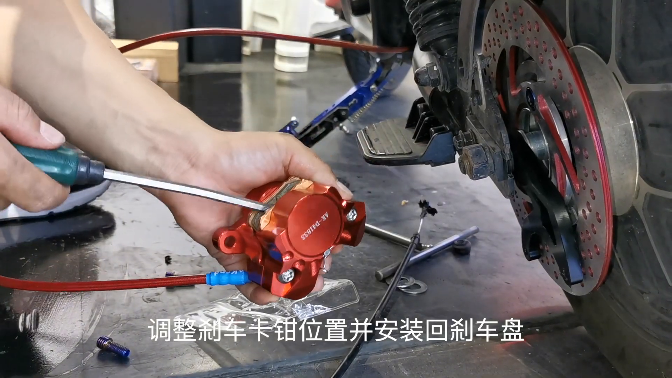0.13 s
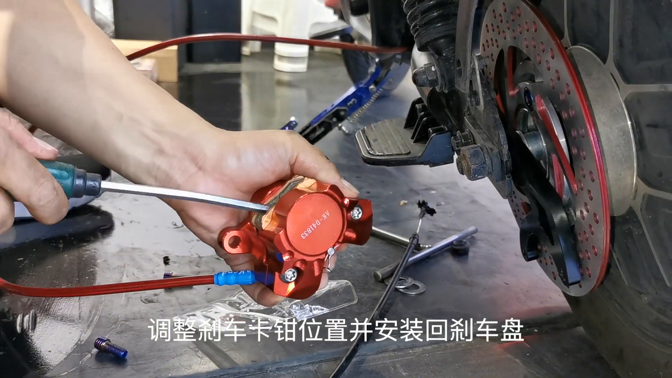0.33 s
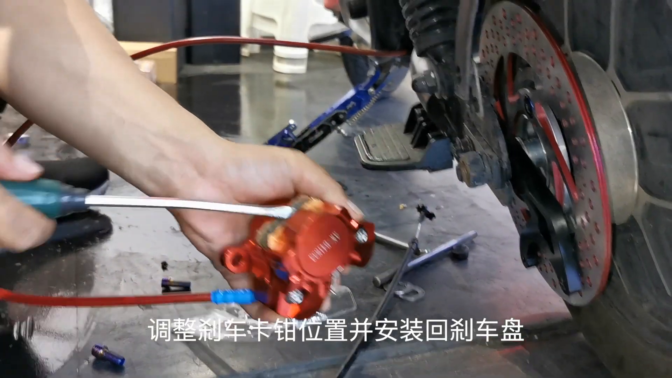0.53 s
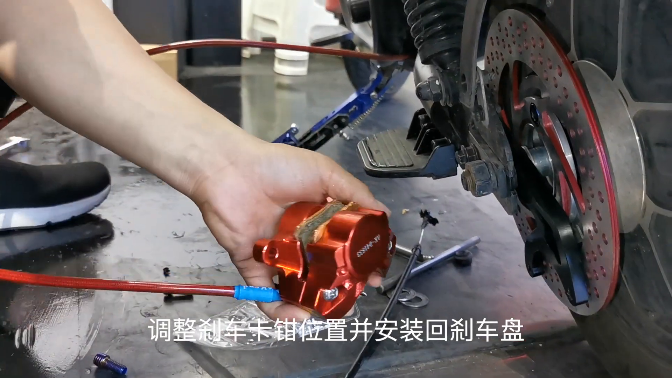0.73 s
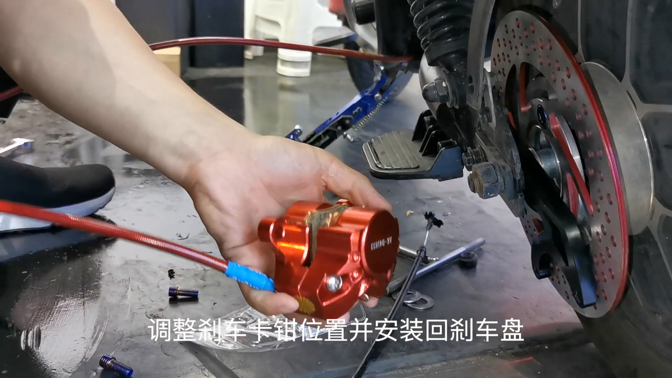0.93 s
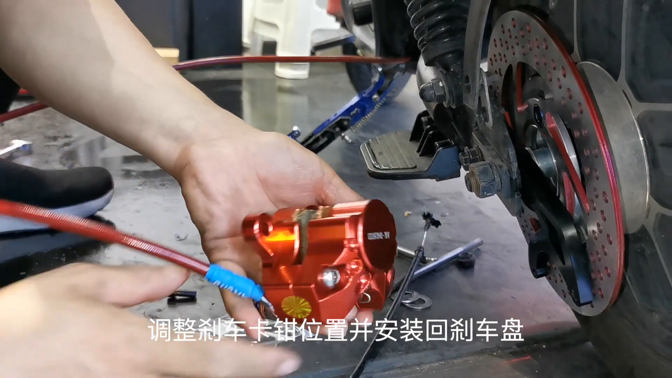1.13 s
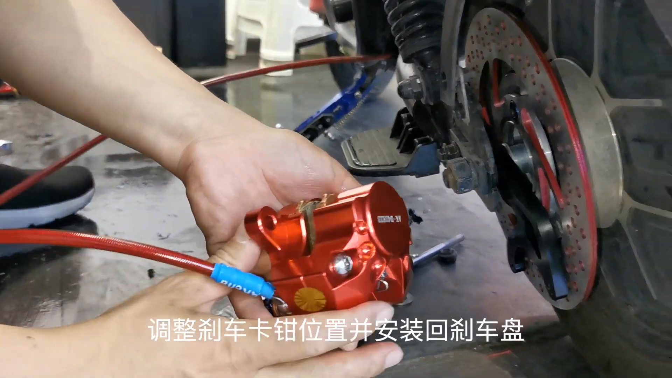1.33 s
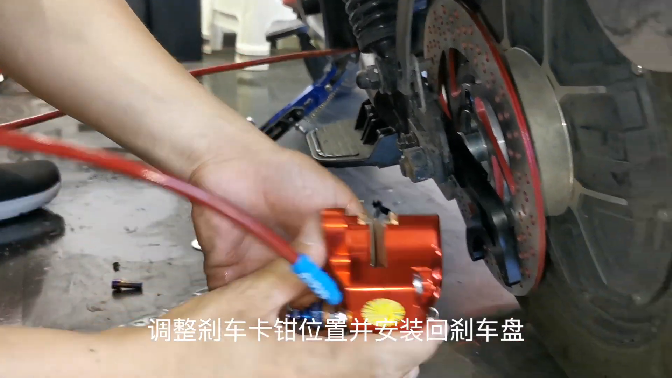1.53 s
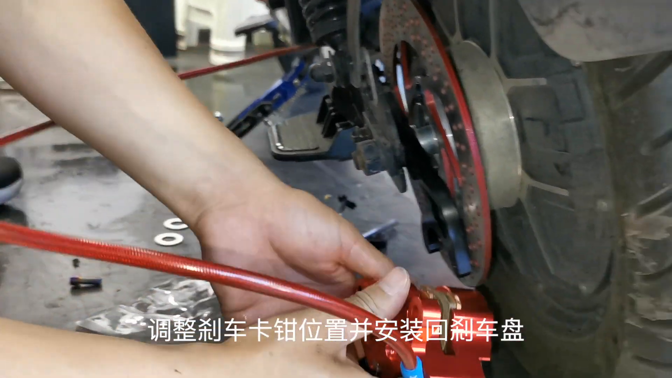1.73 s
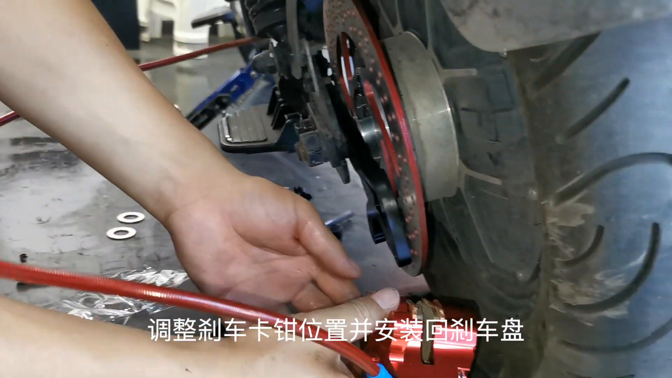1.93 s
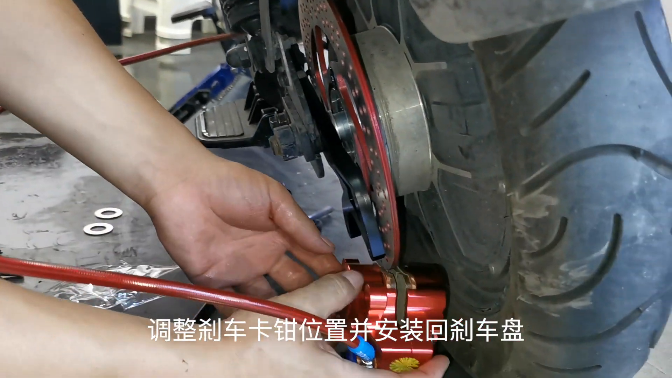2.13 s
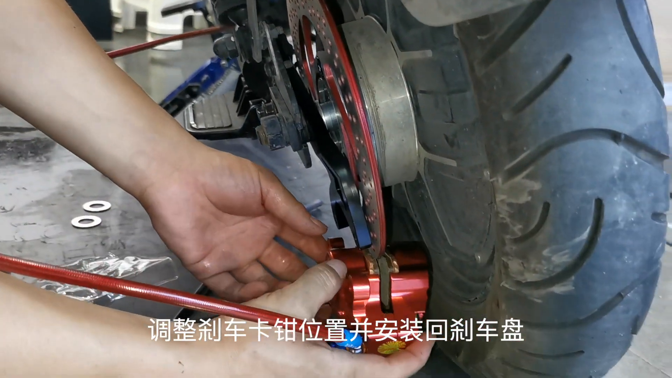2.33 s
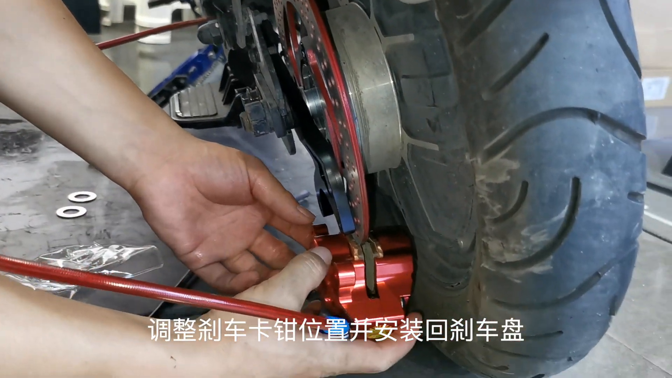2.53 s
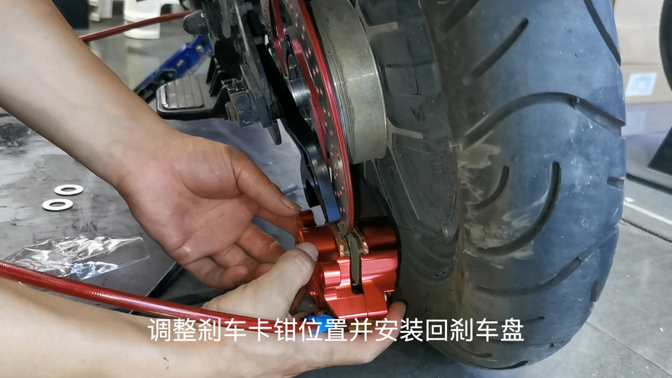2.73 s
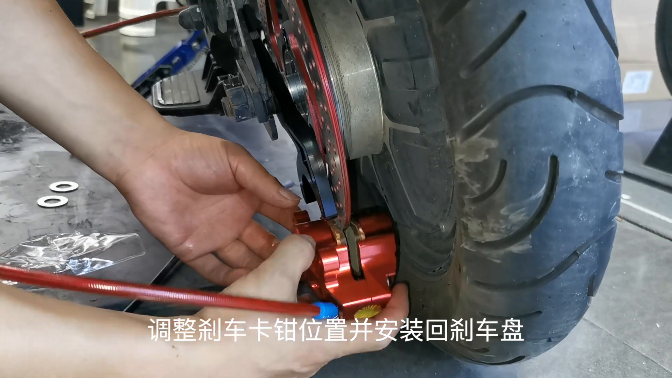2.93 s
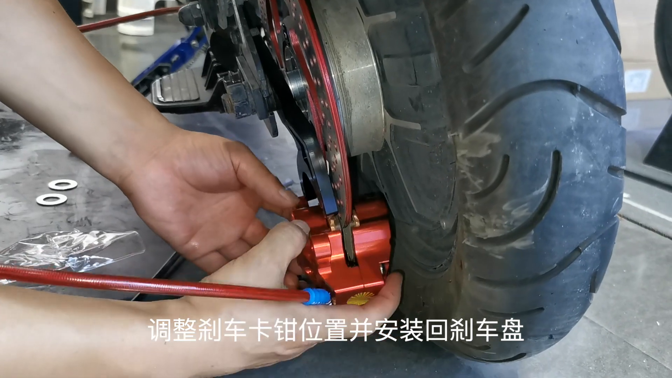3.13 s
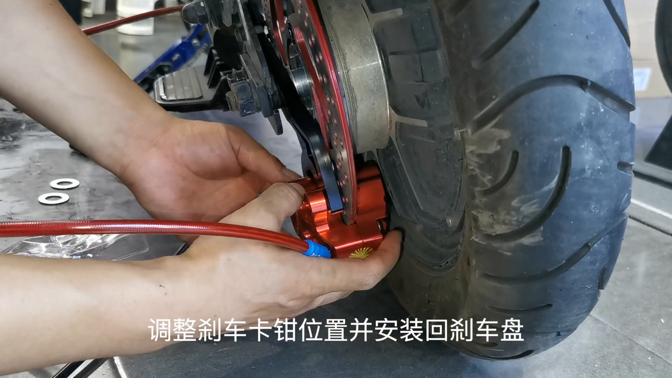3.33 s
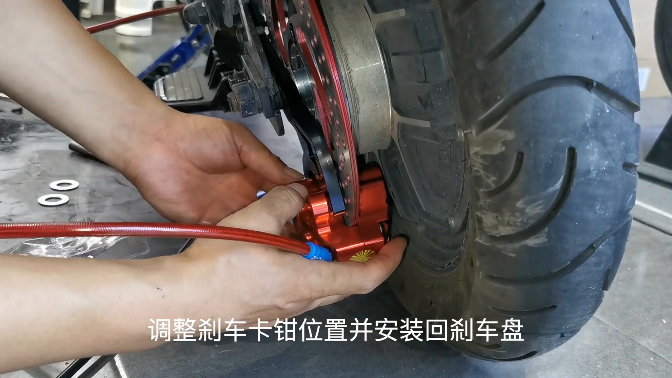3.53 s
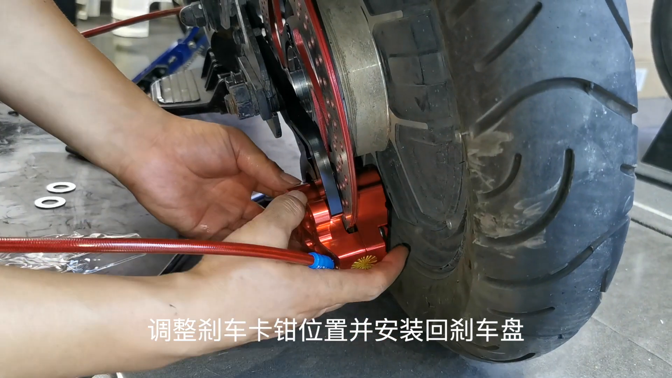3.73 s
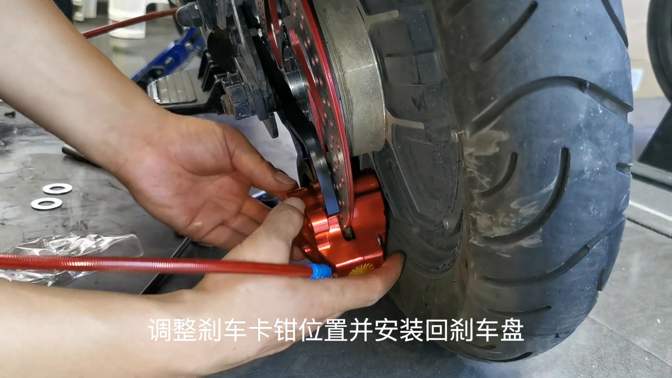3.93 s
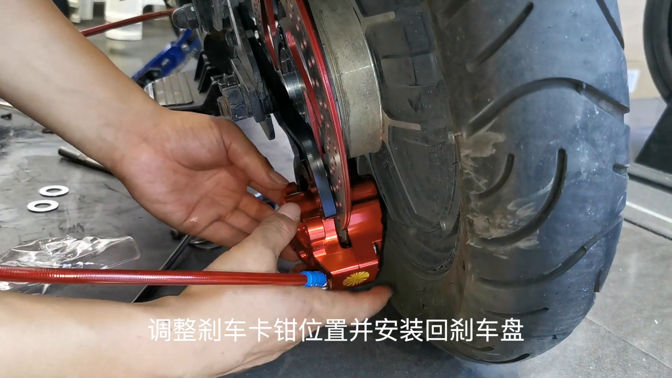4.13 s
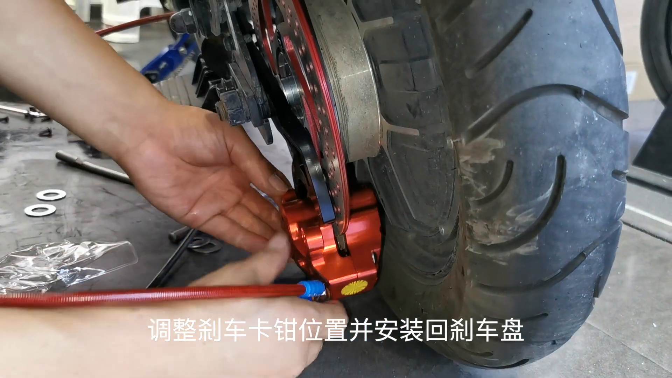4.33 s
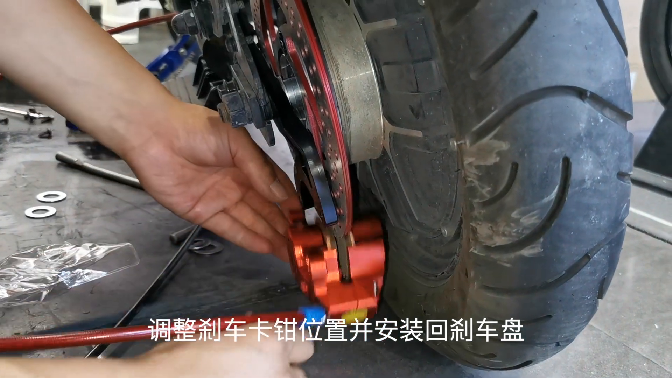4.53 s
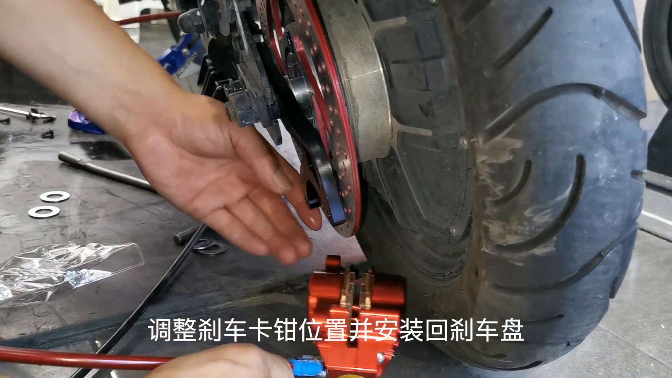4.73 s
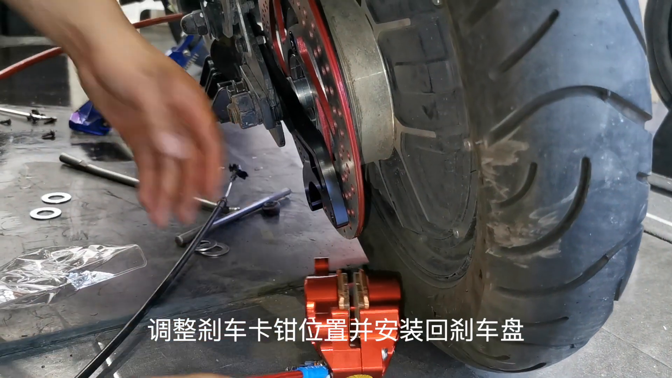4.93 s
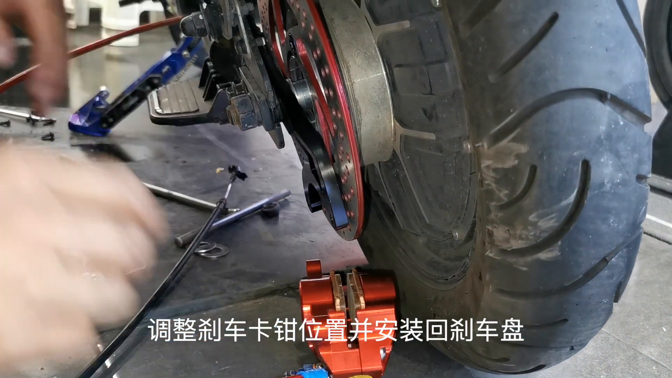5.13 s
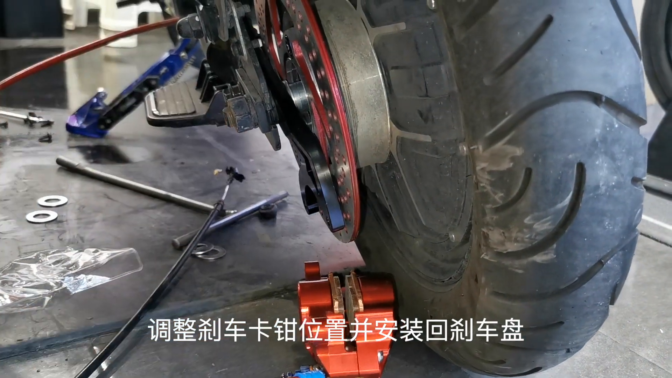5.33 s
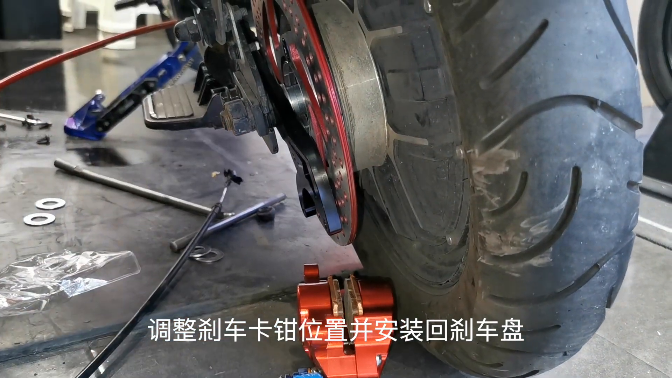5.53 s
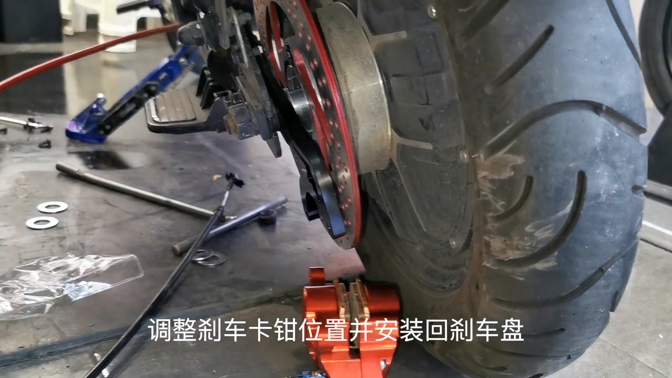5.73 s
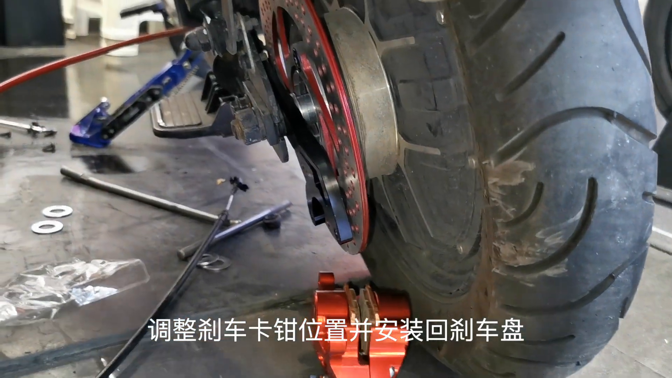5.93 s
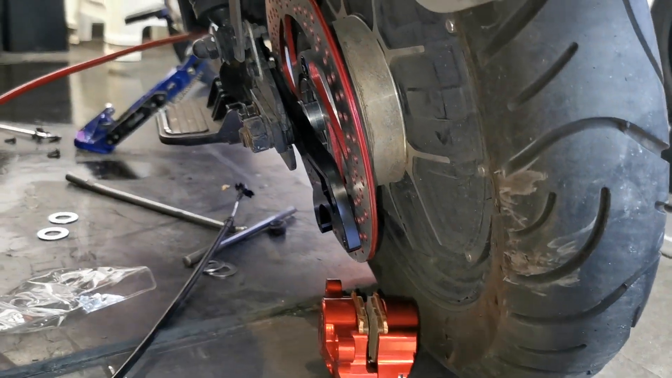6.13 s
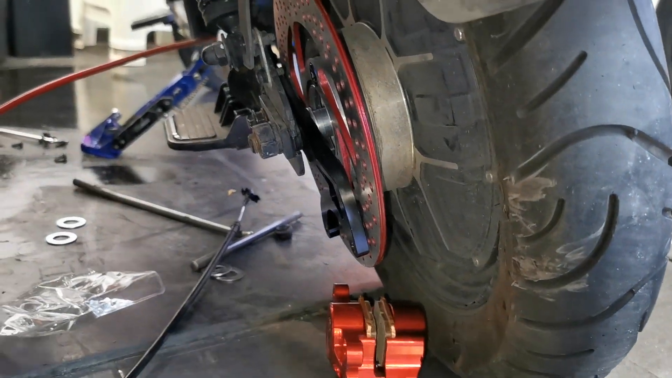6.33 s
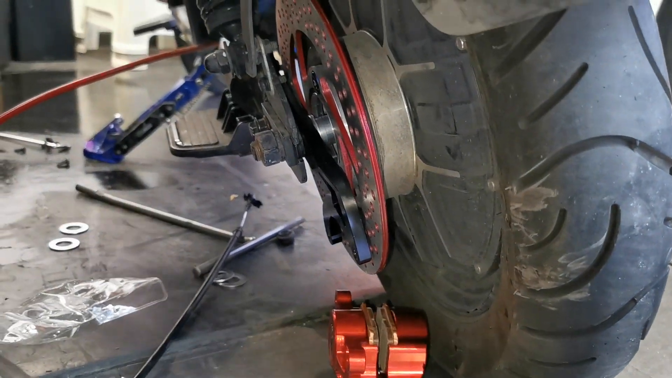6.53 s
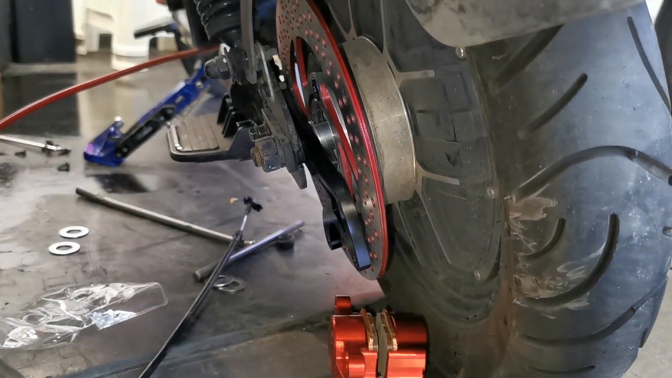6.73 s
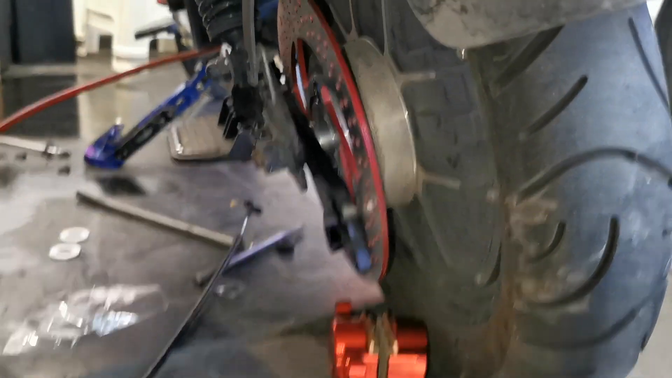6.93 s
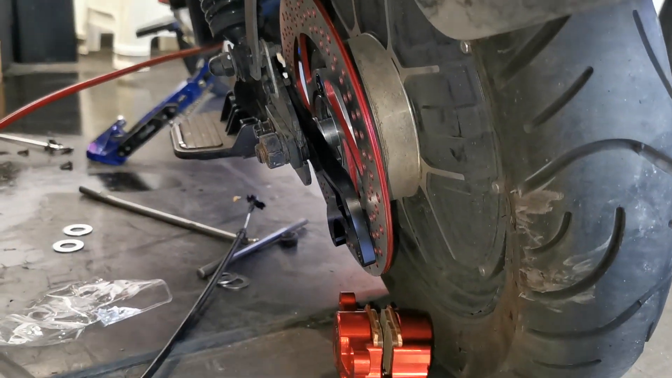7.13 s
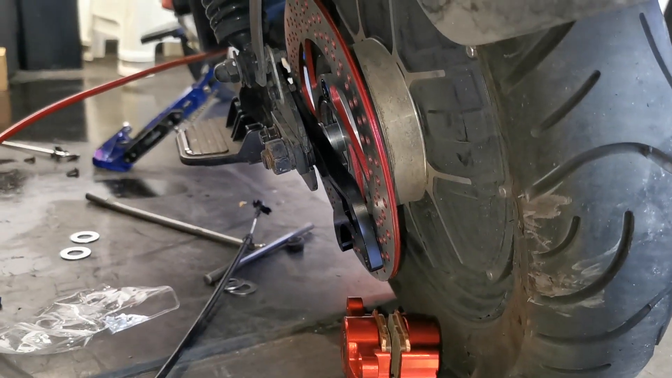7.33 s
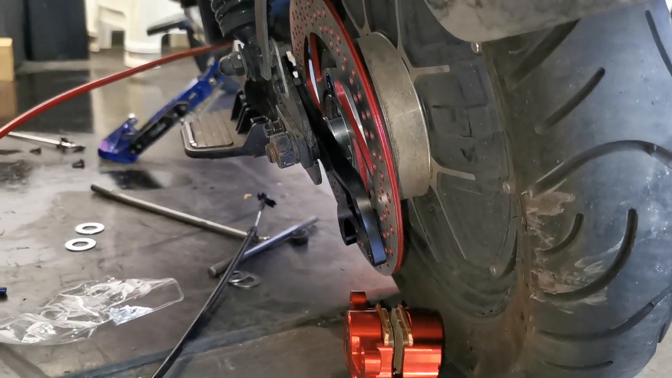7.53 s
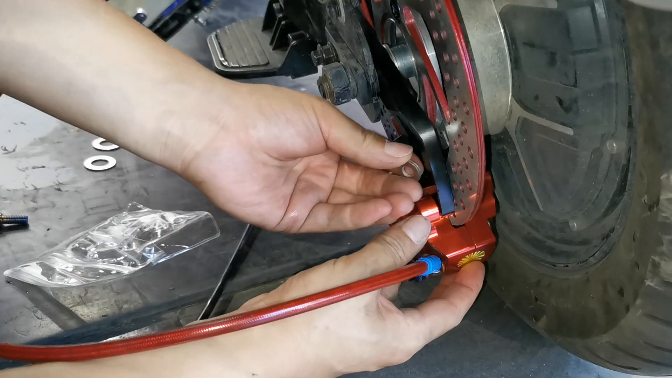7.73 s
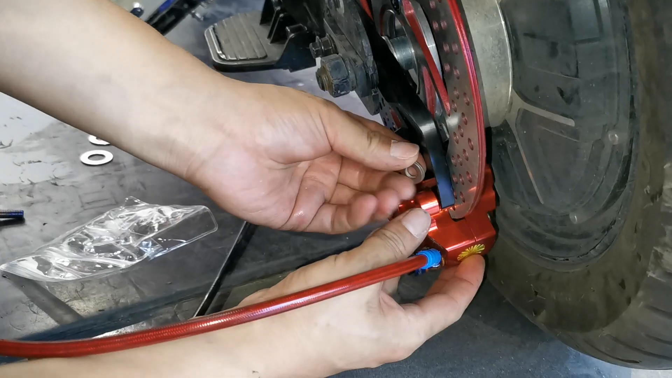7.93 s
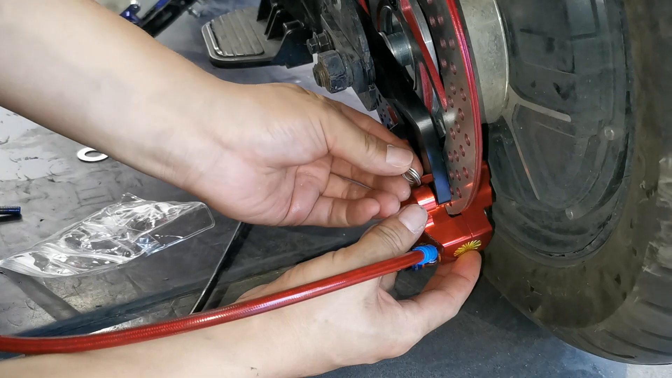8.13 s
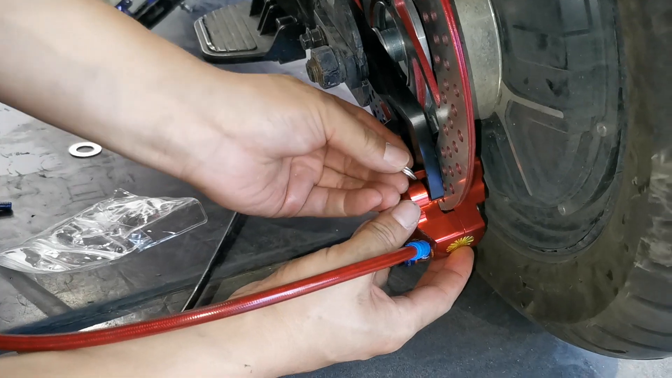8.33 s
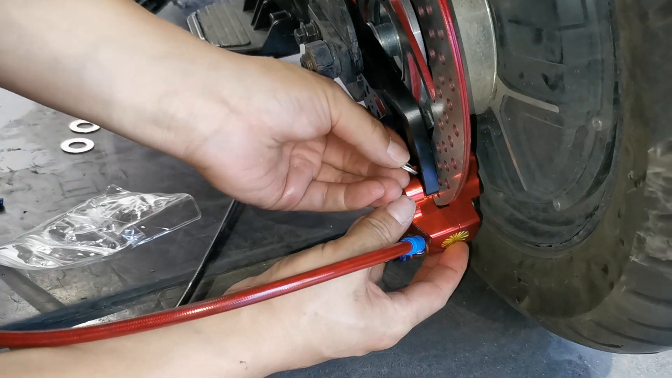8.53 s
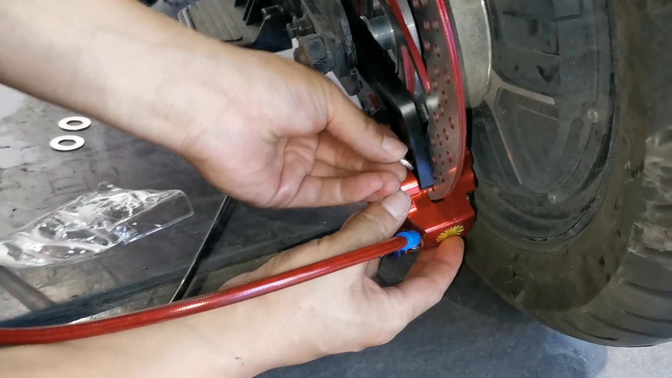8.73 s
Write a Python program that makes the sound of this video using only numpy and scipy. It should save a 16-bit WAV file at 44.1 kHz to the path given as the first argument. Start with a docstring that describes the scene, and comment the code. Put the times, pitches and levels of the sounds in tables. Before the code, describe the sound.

A dropped screwdriver clatters on a workshop floor, then a metal brake caliper clinks on a steel disc, knocks down, and a shoe squeaks.

```python
"""Fitting a brake caliper by hand

Modal impact: a dropped screwdriver bounces, the caliper clinks on the steel disc, bumps the wheel bracket
and is set on the floor; each blow sums decaying sines and noise bursts. Friction: a blade and a pad edge
sing as wavering tones, rubbed parts filter uneven noise, a shoe squeaks as coloured stick-slip pulses.
Sleeves rustle as shaped noise and wheel and stand shudder in low bands. Walls answer with decaying noise
over the rumble and hiss of a bare workshop, heard at the two microphone ports of a phone."""
import sys
import numpy as np
from scipy import signal
from scipy.fft import rfft, irfft, next_fast_len
from scipy.io import wavfile
from scipy.ndimage import uniform_filter1d

SR = 44100
rng = np.random.default_rng(int(sys.argv[2]) if len(sys.argv) > 2 else 0)


def persist_wave(psi):
    """Save psi, clipped to +-1, as 16-bit WAV."""
    counts = np.round(np.clip(psi, -1, 1) * 32767).astype(np.int16)
    wavfile.write(sys.argv[1], SR, np.atleast_2d(counts).T)


N = 387153
T = np.arange(N) / SR
M = next_fast_len(N)  # transform length
HZ = np.arange(M // 2 + 1) * SR / M + 1e-3  # just above 0, for the logarithms

# Levels in all tables hold ahead of the microphone ports; modes are nominal and vary from blow to blow.
# Blows: (time [s], ring peak [dB], hollow knock peak [dB], tick peak [dB], contact [s])
# dropped screwdriver, columns as blows
SCREWDRIVER_BOUNCES = [(0.9504, -10.5, -22.5, -33, 0.0064), (1.0339, -16.5, 2, -24, 0.0044),
                       (1.042, -1, -24.5, -42.5, 0.0009), (1.092, -28.5, -18.5, -56.5, 0.012),
                       (1.1314, -7.5, -27.5, -24, 0.0057), (1.1959, -7.5, -31, -29, 0.0054),
                       (1.2364, -9, -36, -35, 0.0052), (1.2624, -18.5, -38, -47.5, 0.016),
                       (1.2825, -20.5, -38.5, -49, 0.031)]
# caliper against disc, columns as blows
DISC_CLINKS = [(2.208, -23.5, -43.5, -40, 0.012), (3.0274, -44, -51, -48, 0.005),
               (3.4095, -14, -18.5, -34.5, 0.0034), (3.422, 1, -14.5, -14.5, 0.005),
               (3.655, -33.5, -48, -54.5, 0.018)]
# knocks of the caliper, columns as blows
CALIPER_KNOCKS = [(0.5944, -54.5, -44, -43.5, 0.0026), (4.7365, -1, -8.5, -41, 0.0024),
                  (4.7391, -7, -38, -14, 0.00045), (4.815, -29.5, -16.5, -33, 0.0019),
                  (4.8219, -19, -14.5, -24.5, 0.00063), (4.8507, -23, -20, -38, 0.0024),
                  (4.8728, -32, -26, -46, 0.002), (4.9237, -38, -33, -49, 0.0051),
                  (7.4583, -23.5, -48, -40, 0.0015)]
# caliper body bumping the wheel bracket, columns as blows
BRACKET_CLUNKS = [(2.2338, -26, -52, -31, 0.0039), (3.152, -15, -24.5, -32, 0.0044),
                  (3.3465, -21, -31.5, -58.5, 0.0074)]
# the blade slipping off the pad, columns as blows
BLADE_SLIP_OFF = [(0.671, -31.5, -59, -48, 0.022)]

# Modes: (frequency [Hz], level [dB], t60 [s])
# bouncing screwdriver, columns as modes
SCREWDRIVER_MODES = [(600, -3, .03), (660, -2, .03), (900, -5, .03), (1500, -6, .02), (2200, -4, .02),
                     (2860, -3, .02), (3170, 0, .02), (3560, -3, .02), (4200, -1, .02), (4670, -4, .02),
                     (5200, -6, .015), (5570, -9, .02)]
# steel disc, columns as modes
DISC_MODES = [(600, 0, .025), (655, -22, .4), (1980, -12, .1), (2265, 4, .045), (2250, -31, .4),
              (2300, -28, .6), (2500, -13, .1), (2850, -13, .1), (3070, -10, .07), (3940, -6, .05),
              (4470, -12, .08), (5110, -5, .045), (6130, -25, .12), (7290, -31, .12), (7860, -33, .15),
              (10770, -31, .18)]
# caliper body, columns as modes
CALIPER_MODES = [(648.3, -3.5, 0.038), (805, 4.5, 0.015), (1076, 3, 0.017), (1619, -1.5, 0.017),
                 (2475, 0.5, 0.011), (2918, 1.5, 0.026), (3366, -4.5, 0.016), (3975, -9.5, 0.0086),
                 (4700, -11, 0.013)]
# wheel bracket, columns as modes
BRACKET_MODES = [(388, -5, 0.22), (633, -3, .1), (922, -4, 0.092), (1180, -1, 0.049), (2310, -5, .06),
                 (2637, -1, .05), (2990, -3, 0.05), (3195, -1.5, 0.11), (3455, -2.5, .04),
                 (3930, -3.5, 0.066), (4905, -9, .025)]
# blade as it slips free, columns as modes
FREE_BLADE_MODES = [(600, 0, .03), (2130, 0, .03), (3400, -3, .025), (4500, -1, .025), (5200, -1, .025)]
# brake pads, columns as modes
PAD_MODES = [(2320, -15.5, 0.027), (2800, -11, 0.02), (4130, -15.5, 0.018), (5130, -7.5, 0.009),
             (7250, -1.5, 0.07), (8790, -10, 0.04), (10770, -17.5, 0.012)]
# spring clip, columns as modes
CLIP_MODES = [(8950, 0, 0.09), (9740, -12, .08)]

# Impact noise: (crack weight against the ring modes [dB], crack t60 [s], thud re knock [dB])
# screwdriver, columns as impact noise
SCREWDRIVER_IMPACT = (3.1, 0.05, -31.5)
# disc, columns as impact noise
DISC_IMPACT = (5.4, 0.061, -17.5)
# caliper, columns as impact noise
CALIPER_IMPACT = (5.6, 0.051, -15)
# bracket, columns as impact noise
BRACKET_IMPACT = (4.8, .1, -9)
# free blade, columns as impact noise
BLADE_IMPACT = (3, 0.032, -32)

# Strokes: (start [s], attack [s], hold [s], release [s], level at the end of the attack [dB])
# blade scraping the pad, columns as strokes
BLADE_STROKES = [(.335, .03, .27, 0.13, -45)]
# a lower tone of the same blade, columns as strokes
LOW_BLADE_STROKES = [(.39, .05, .11, .06, -56.5)]
# pad edge squealing on the disc, columns as strokes
EDGE_STROKES = [(2.265, 0.017, 0.039, 0.033, -50)]
# the main ring of the disc swelling again, columns as strokes
DISC_SWELL_STROKES = [(2.22, .02, 0.12, 0.12, -48), (3.515, .018, 0.025, 0.036, -30.5)]
# disc chattering on after a blow, columns as strokes
DISC_CHATTER_STROKES = [(3.425, 0.0075, 0.14, 0.044, -36.5)]
# caliper chattering on after a blow, columns as strokes
CALIPER_CHATTER_STROKES = [(4.74, 0.0047, 0.2, 0.14, -33)]
# screwdriver chattering on after a blow, columns as strokes
TOOL_CHATTER_STROKES = [(1.045, .015, 0.227, 0.11, -37)]
# pads rubbing, columns as strokes
PAD_STROKES = [(3.025, 0.0057, 0.088, 0.11, -56.5), (3.29, 0.063, 0.042, .07, -49),
               (4.57, 0.086, 0.061, .01, -45.5)]
# spring clip rubbing, columns as strokes
CLIP_STROKES = [(7.63, 0.03, 0.048, 0.012, -61.5)]
# shoe squeaking, columns as strokes
SHOE_STROKES = [(5.336, 0.0033, 0.0054, 0.0033, -48.5), (5.345, 0.0044, 0.07, 0.045, -32)]
# sleeves rustling, columns as strokes
SLEEVE_STROKES = [(3.85, .27, 0.03, 0.091, -53.5), (7.1, 0.049, 0.059, 0.033, -63),
                  (7.2, 0.21, 0.048, 0.18, -45), (7.575, 0.034, 0.023, 0.032, -41)]
# wheel and stand: (start [s], attack [s], hold [s], release [s], wheel level [dB], stand level [dB])
SHUDDER_STROKES = [(2.218, 0.015, 0.098, 0.13, -35.5, -47.5), (3.139, 0.039, 0.044, 0.091, -36.5, -36),
                   (3.331, .04, 0.061, 0.12, -40.5, -37), (4.76, 0.064, 0.124, 0.082, -43.5, -75),
                   (7.452, 0.0067, 0.0044, 0.12, -38, -39)]

# tone of the blade: (frequency [Hz], level [dB])
BLADE_TONE = [(4700, 0)]
# lower tone of the blade: (frequency [Hz], level [dB])
LOW_BLADE_TONE = [(3370, 0)]
# tone of the pad edge: (frequency [Hz], level [dB])
EDGE_TONE = [(4470, 0)]
# main ring of the disc: (frequency [Hz], level [dB])
DISC_MAIN_TONE = [(2285, 0)]

# dry clicks and brief narrow pings: (time [s], peak [dB], centre [Hz], width [Hz], t60 [s])
CLICKS_AND_PINGS = [(2.232, -31, 4950, 500, .05), (2.467, -52, 4720, 120, 0.045),
                    (7.0602, -30, 1530, 1980, 0.0093), (7.061, -23.5, 4280, 8520, 0.0065),
                    (8.217, -40, 12400, 8100, 0.073)]
# resonances of the rubber sole: (centre [Hz], width [Hz], level [dB])
SOLE_BANDS = [(817, 480, -6.5), (1370, 280, -8.5), (2150, 582, -0.5), (3560, 670, -10.5),
              (4720, 850, -14.5), (9900, 4600, -27)]
# spectrum of rubbed cloth: (frequency [Hz], relative density [dB per Hz])
CLOTH_SPECTRUM = [(240, -51), (400, -8.5), (666, -1.5), (839, -3), (1200, -5.5), (1460, -5), (2880, -7),
                  (10900, -15.5), (16000, -19.5)]
# walls: (frequency [Hz], gain [dB], decay setting, nominal as the fade is quickened [s])
WALL_DECAY = [(100, -19.5, 0.32), (500, -15, 0.49), (1950, -10, 0.35), (4100, -13, 0.46), (5500, -8.5, 0.6),
              (6500, -19.5, 0.3), (14410, -16.5, 0.3)]
# background level as the phone's gain control moves it, with some rubbing near 3.3 s:
# (time [s], rumble level [dB], whirr level [dB])
SHOP_LEVELS = [(0, -47, -55), (.35, -48, -57), (.9, -49, -59), (1.5, -52.5, -59.5), (2.1, -51, -57),
               (2.899, -50.5, -62.5), (3.3, -49, -50.5), (3.8, -53, -59.5), (4.499, -53, -61.5),
               (5.1, -59, -64), (5.7, -60, -67), (5.9, -59, -61.5), (6.6, -58.5, -62.5), (7.2, -59, -64.5),
               (7.7, -49.5, -58.5), (8.78, -53, -62.5)]
# spectrum of the shop: (frequency [Hz], relative density [dB per Hz])
SHOP_SPECTRUM = [(21, -27), (30, -11.5), (40, -3.5), (103, -8.5), (293, -16.5), (465, -15), (1110, -17.5),
                 (1600, -21.5), (2300, -18), (3300, -27.5), (5200, -23), (6500, -35.5), (7960, -45),
                 (12900, -38), (16300, -52)]
# hum in the rumble: (centre [Hz], width [Hz], level re rumble [dB])
HUM_BANDS = [(44.3, 2.7, -9.5), (99, 7.9, -10.5), (172, 8, -18), (277, 5.9, -20.5)]
# correlation of the shop between the ports: (frequency [Hz], correlation [0-1])
PORT_LIKENESS = [(60, 0.6), (290, 0.95), (640, 0), (1400, 0.1)]
# shading by the phone's body: (frequency [Hz], left minus right [dB])
PORT_SHADE = [(60, 2), (250, 2.5), (600, -3.5), (1200, -4), (2400, -11.5), (4400, -12.5), (8000, 5.5),
              (14000, -5)]

# level lost during the hold of a stroke [dB per s]; the squeak grows
BLADE_SAG, EDGE_SAG, CHATTER_SAG, PAD_SAG, CLIP_SAG = 35, 44, 55, 48, 69
SQUEAK_SAG, RUSTLE_SAG, SHUDDER_SAG = -44, 4.3, 47
SILENT_DB = 25  # depth from which a stroke swells and to which it dies
CHATTER_DAMP = 5  # factor by which touching parts widen the modes
SLIP_HZ, SLIP_END_HZ, SLOWS_S, SLOWED_S = 910, 639, 5.375, 5.425  # the sole slows as the foot settles
SHUDDER_LAG_S = 0.0002  # the floor carries the shudder to the right port later
MURMUR_DB, HISS_DB = -4, -8.5  # re rumble and re whirr
LEFT_LEAD_S, ROUND_BODY_HZ = .0005, 1390  # limit of the treble lag, and where a half of it is reached
# random phase makes the treble differ between the ports: spread, full from here up
SCATTER_RAD, SCATTER_HZ = 7.7, 6963
TOP_HZ = 16100


def undb(db):
    """Amplitude ratio of a level in dB."""
    return 10 ** (np.asarray(db) / 20)


def unit(x):
    """Normalization to unit rms."""
    return x / np.sqrt(np.mean(x ** 2))


def over_hz(table, hz, column=1):
    """Interpolation of a table on a logarithmic frequency axis."""
    table = np.array(table, float)
    return np.interp(np.log(hz), np.log(table[:, 0]), table[:, column])


def gain(strokes, sag):
    """Stroke envelopes: straight in dB up the attack, along the sagging hold and down the release."""
    out = 0
    for start, attack, hold, release, db in strokes:
        end_db = db - sag * hold
        corners = start + np.cumsum(np.abs([0, attack, hold, release]))
        levels = [db - SILENT_DB, db, end_db, end_db - SILENT_DB]
        out = out + undb(np.interp(T, corners, levels, left=-150, right=-150))
    return out


def band(x, lo_hz, hi_hz):
    """Band-pass filtering."""
    sos = signal.butter(2, [lo_hz, min(hi_hz, SR / 2.2)], "band", fs=SR, output="sos")
    return signal.sosfilt(sos, x)


def shape(x, response):
    """Filtering by a frequency response."""
    return irfft(rfft(x, M) * response, M)[..., :N]


def fade(t, t60):
    """Exponential decay, 60 dB down at t60."""
    return np.exp(-np.log(1000) * t / t60)


def walk(rate):
    """Random modulation: values held 1 / rate s, smoothed twice; spread near 1."""
    k = int(SR / rate)
    held = np.repeat(rng.standard_normal(N // k + 1), k)
    return 1.8 * uniform_filter1d(uniform_filter1d(held, k), k)[:N]


def add(out, s, x, db):
    """Superposition of x at time s with the given peak."""
    i = int(s * SR)
    out[i:i + len(x)] += (x * undb(db) / np.abs(x).max())[:N - i]


def blows(rows, modes, crack_db, crack_t60, thud_db, ring_from_hz=1300):
    """Modal impact: contact swells, the modes ring afresh, and noise gives a crack, a thud and a tick."""
    out, t = np.zeros(N), T[:SR // 2]
    hz, db, t60 = np.transpose(modes)[:, :, None]
    high = hz[:, 0] > ring_from_hz
    for s, ring_db, knock_db, tick_db, contact in rows:
        swell = np.sin(np.pi / 2 * np.clip(t / max(contact, 1e-4), 0, 1)) ** 2
        level_chance, pitch_chance = rng.standard_normal((2, len(modes), 1))
        noise = rng.standard_normal(len(t))
        tones = np.sin(2 * np.pi * hz * (1 + 0.0055 * pitch_chance) * t)
        lines = undb(db + 2.2 * level_chance) * fade(t, t60) * tones * swell
        # each ring soon flutters at random
        held = np.repeat(rng.standard_normal((len(modes), len(t) // 350 + 1)), 350, axis=1)[:, :len(t)]
        lines = lines * undb(5.5 * np.clip(t / .04, 0, 1) * uniform_filter1d(held, size=300, axis=1))
        crack = band(band(band(noise, 1200, 4500), 700, 5500), 550, 5500)
        crack = undb(crack_db) * crack * swell * fade(t, crack_t60)
        thud = band(noise, 150, 500) * swell * fade(t, .06)
        tick = band(noise, 4400, 13000) * swell * fade(t, 0.012)
        add(out, s, lines[high].sum(axis=0) + crack, ring_db)
        add(out, s, lines[~high].sum(axis=0), knock_db)
        add(out, s, thud, knock_db + thud_db)
        add(out, s, tick, tick_db)
    return out


def squeal(strokes, sag, modes, glide, waver=0.0054):
    """Locked stick-slip: each mode sings alone, wavering and sinking by the share glide over a second."""
    since = np.clip(T - strokes[0][0], 0, 1)
    tones = 0
    for hz, db in modes:
        level = undb(db + 3.0 * walk(70))
        pitch = hz * (1 - glide * since + waver * walk(400))
        tones = tones + level * np.sin(2 * np.pi * np.cumsum(pitch) / SR)
    return gain(strokes, sag) * unit(tones)


def rub(strokes, sag, modes, damp=1):
    """Dry friction: dense uneven micro-slips feed the resonances of the rubbed part."""
    slips = rng.standard_normal(N) * undb(1.4 * walk(200))
    hz, db, t60 = np.transpose(modes)[:, :, None]
    width = damp * np.log(1000) / (2 * np.pi * t60)
    body = np.sum(undb(db) * width / (width + 1j * (HZ - hz)), axis=0)
    body = body / (1 + (HZ / hz.max() / 1.1) ** 8)  # little above the top mode
    return gain(strokes, sag) * unit(shape(slips, body))


def squeak():
    """Stick-slip of rubber: pulses at a falling rate, every third one harder, coloured by the sole."""
    rate = np.interp(T, [SLOWS_S, SLOWED_S], [SLIP_HZ, SLIP_END_HZ])
    slips = np.floor(np.cumsum(rate * (1 + 0.045 * walk(500))) / SR)
    strength = undb(2 * walk(700) + 4.0 * (slips % 3 == 0))
    pulses = np.diff(slips, prepend=0) * strength + .09 * rng.standard_normal(N)
    sole = sum(undb(db) * unit(band(pulses, hz - w / 2, hz + w / 2)) for hz, w, db in SOLE_BANDS)
    return gain(SHOE_STROKES, SQUEAK_SAG) * unit(sole)


def ticks():
    """Short noise bursts: small dry clicks and brief narrow pings."""
    out, t = np.zeros(N), T[:SR // 10]
    for s, db, hz, width_hz, t60 in CLICKS_AND_PINGS:
        noise = rng.standard_normal(len(t))
        click = band(noise, max(hz - width_hz / 2, 100), hz + width_hz / 2) * fade(t, t60)
        add(out, s, click, db)
    return out


def shudder():
    """Loose low vibration in noise bands: the wheel hums and the stand booms deeper."""
    noise, rows = rng.standard_normal(N), np.array(SHUDDER_STROKES)
    wheel = band(noise, 97, 400) + 1.4 * band(noise, 260, 305)
    wheel = wheel + 1.0 * band(noise, 590, 670) + 0.29 * band(noise, 360, 960)
    stand = band(noise, 70, 130)
    wheel_gain = gain(rows[:, :5], SHUDDER_SAG)
    stand_gain = gain(np.delete(rows, 4, axis=1), SHUDDER_SAG)
    return wheel_gain * unit(wheel) + stand_gain * unit(stand)


def rustle():
    """Cloth friction: shaped hiss with a grainy level, independent noise at each port."""
    hiss = irfft(rfft(rng.standard_normal((2, M))) * undb(over_hz(CLOTH_SPECTRUM, HZ)), M)[:, :N]
    return gain(SLEEVE_STROKES, RUSTLE_SAG) * unit(hiss) * undb(1.2 * walk(200))


def walls(x):
    """Reverberation: decaying noise in octave bands, its fade quickened as by the phone's level control."""
    t, tails = T[:int(.7 * SR)], 0
    for hz in 110 * 2. ** np.arange(8):
        # a different tail for each port
        noise = band(rng.standard_normal((2, len(t))), hz / np.sqrt(2), hz * np.sqrt(2))
        t60 = over_hz(WALL_DECAY, hz, column=2)
        tails = tails + noise * fade(t * (.5 + 1.0 * t), t60) / np.sqrt(t60 * SR / 14)
    tails = tails * np.clip(t / 0.0056, 0, 1)  # the first echoes take a few ms
    return shape(x, rfft(tails, M) * undb(over_hz(WALL_DECAY, HZ)))


def shop():
    """Diffuse background: octave bands flicker independently, noise more alike at the ports in the bass."""
    like = np.clip(over_hz(PORT_LIKENESS, HZ), 0, 1)
    spectra = rfft(rng.standard_normal((2, M))) * undb(over_hz(SHOP_SPECTRUM, HZ))
    mid, side = spectra * np.sqrt([1 + like, 1 - like])
    pair = np.array([mid + side, mid - side])
    s, bass, treble = np.transpose(SHOP_LEVELS)
    levels = bass, bass + MURMUR_DB, treble, treble + HISS_DB
    layers = [0, 0, 0, 0]  # rumble, murmur, whirr, hiss
    for hz in 20 * 2. ** np.arange(10):
        share = np.cos(np.pi / 2 * np.clip(np.log2(HZ / hz), -1, 1)) ** 2
        flicker = undb(0.6 * walk(9.9) + 1.1 * walk(4.6))
        k = int(hz > 300) + int(hz > 1800) + int(hz > 6000)
        layers[k] = layers[k] + irfft(pair * share, M)[:, :N] * flicker
    hum = 0
    for hz, width_hz, db in HUM_BANDS:
        noise = rng.standard_normal(N)
        hum = hum + undb(db) * unit(band(noise, hz - width_hz / 2, hz + width_hz / 2))
    layers[0] = unit(layers[0]) + hum
    return sum(unit(x) * undb(np.interp(T, s, db)) for x, db in zip(layers, levels))


def around_phone(x):
    """Diffraction: treble from the left bends round the phone and lags, the bass meets both ports at once."""
    lag = LEFT_LEAD_S * HZ ** 2 / (HZ ** 2 + ROUND_BODY_HZ ** 2)
    scatter = np.interp(HZ, np.linspace(0, SR / 2, num=60), rng.standard_normal(60))
    turn = 2 * np.pi * HZ * lag + SCATTER_RAD * scatter * np.clip(HZ / SCATTER_HZ, 0, 1) ** 4
    return np.array([x, shape(x, np.exp(-1j * turn))])


def scene():
    """Superposition of direct sound, wall reflections and background at the left and right ports."""
    hits = blows(SCREWDRIVER_BOUNCES, SCREWDRIVER_MODES, *SCREWDRIVER_IMPACT, ring_from_hz=800)
    hits += blows(DISC_CLINKS, DISC_MODES, *DISC_IMPACT)
    hits += blows(CALIPER_KNOCKS, CALIPER_MODES, *CALIPER_IMPACT)
    hits += blows(BRACKET_CLUNKS, BRACKET_MODES, *BRACKET_IMPACT)
    hits += blows(BLADE_SLIP_OFF, FREE_BLADE_MODES, *BLADE_IMPACT)
    hits += squeal(BLADE_STROKES, BLADE_SAG, BLADE_TONE, glide=0.06, waver=0.0075)
    hits += squeal(LOW_BLADE_STROKES, BLADE_SAG, LOW_BLADE_TONE, glide=0.06)
    hits += squeal(EDGE_STROKES, EDGE_SAG, EDGE_TONE, glide=0)
    hits += squeal(DISC_SWELL_STROKES, EDGE_SAG, DISC_MAIN_TONE, glide=0)
    hits += rub(DISC_CHATTER_STROKES, CHATTER_SAG, DISC_MODES, CHATTER_DAMP)
    hits += rub(CALIPER_CHATTER_STROKES, CHATTER_SAG, CALIPER_MODES, CHATTER_DAMP)
    # the tool chatters without its two lowest modes
    hits += rub(TOOL_CHATTER_STROKES, CHATTER_SAG, SCREWDRIVER_MODES[2:], CHATTER_DAMP)
    hits += squeak()
    # pads and clip face both ports alike
    ahead = rub(PAD_STROKES, PAD_SAG, PAD_MODES) + rub(CLIP_STROKES, CLIP_SAG, CLIP_MODES)
    low = shudder()
    lows = np.array([low, np.interp(T - SHUDDER_LAG_S, T, low)])
    # the clicks stay dry, without wall reflections
    direct = around_phone(hits) + ahead + ticks() + lows
    return direct + walls(hits + low + ahead) + rustle() + shop()


def record(dry):
    """Body shading and saturation: each port is coloured, peaks are rounded and the top is cut."""
    shade = undb(over_hz(PORT_SHADE, HZ))
    both = np.sqrt(2 / (1 + shade ** 2))  # keeps the summed power of the ports
    ports = shape(dry, np.array([shade * both, both]))
    rounded = np.tanh(0.86 * ports) / 0.89
    return signal.sosfilt(signal.ellip(10, .2, 90, TOP_HZ, fs=SR, output="sos"), rounded)


dry = scene()
out = record(dry)
persist_wave(out)
```